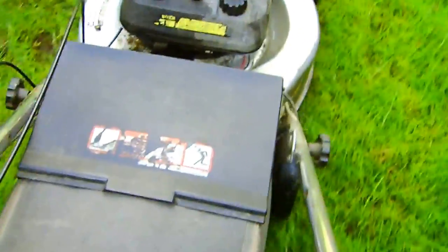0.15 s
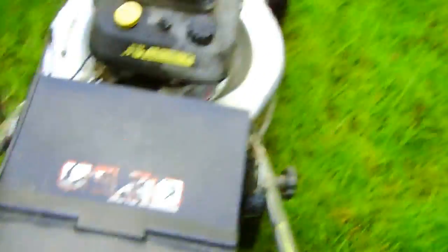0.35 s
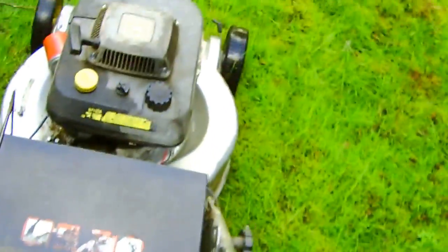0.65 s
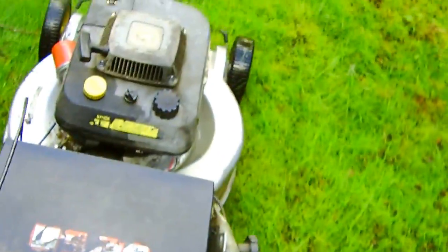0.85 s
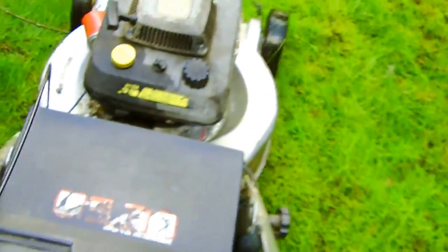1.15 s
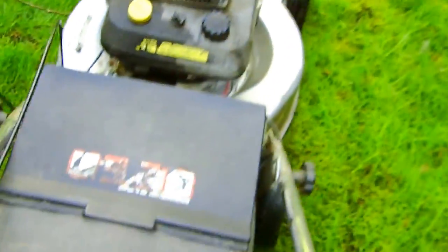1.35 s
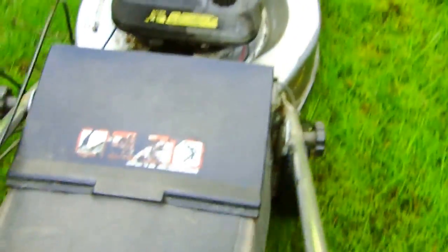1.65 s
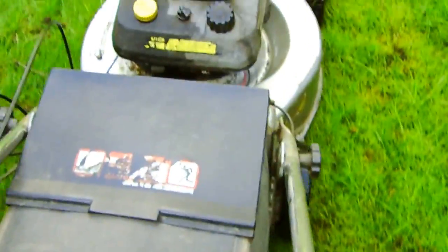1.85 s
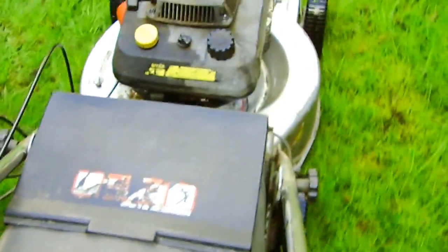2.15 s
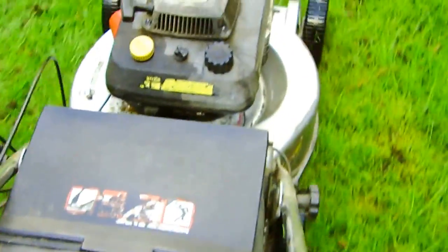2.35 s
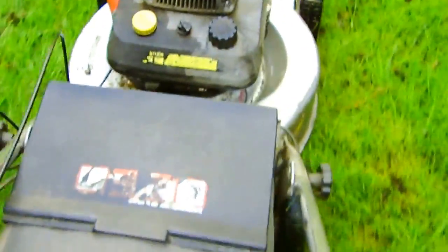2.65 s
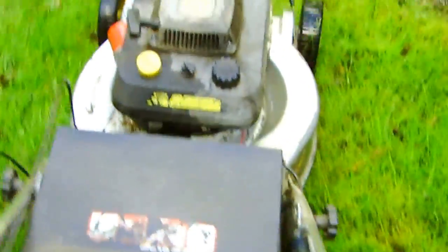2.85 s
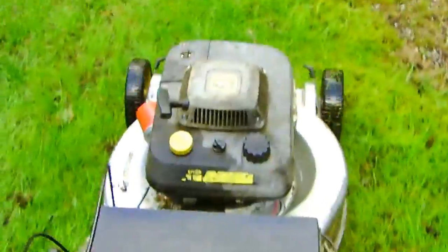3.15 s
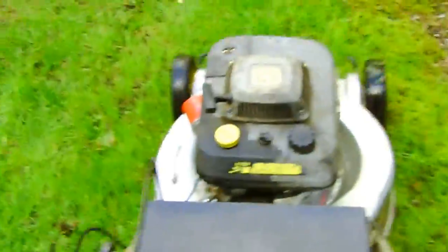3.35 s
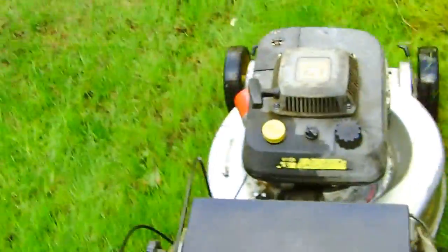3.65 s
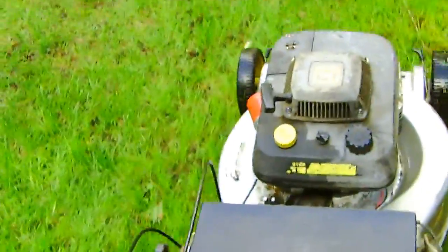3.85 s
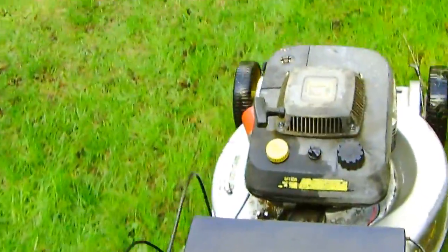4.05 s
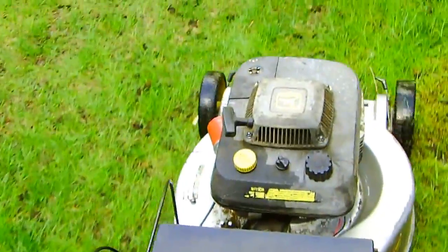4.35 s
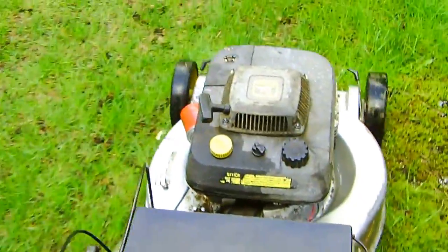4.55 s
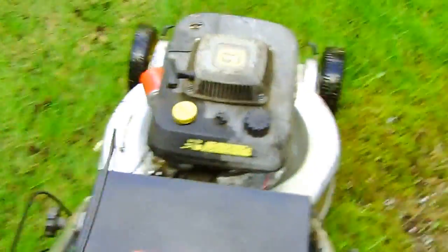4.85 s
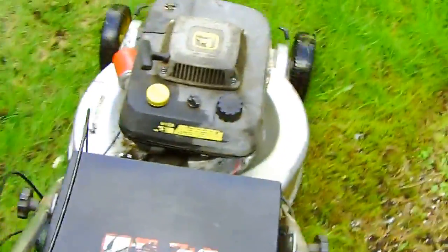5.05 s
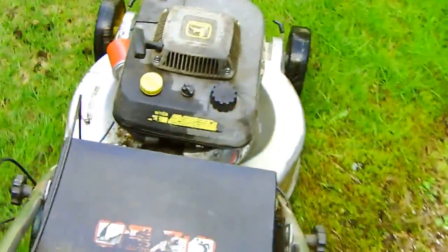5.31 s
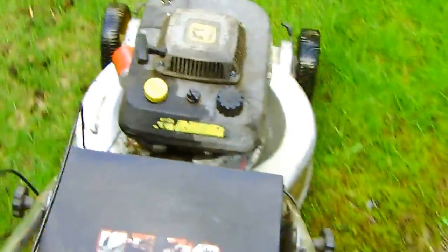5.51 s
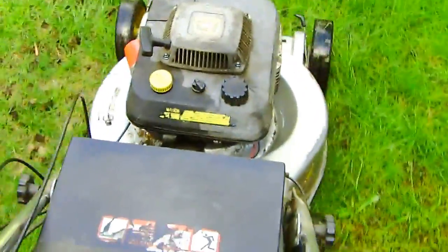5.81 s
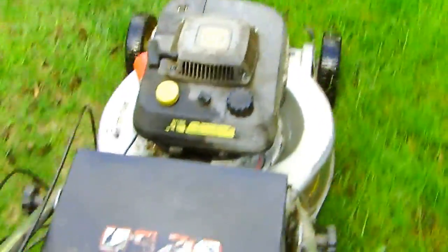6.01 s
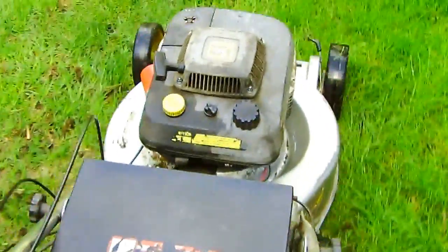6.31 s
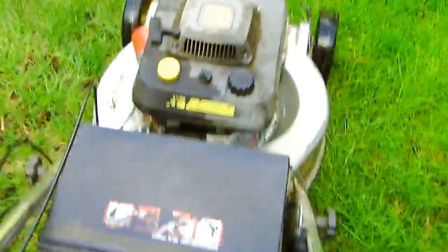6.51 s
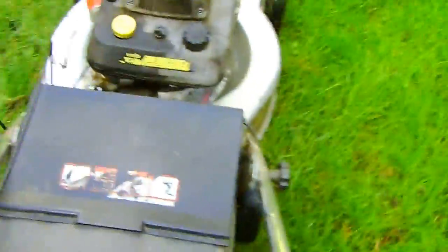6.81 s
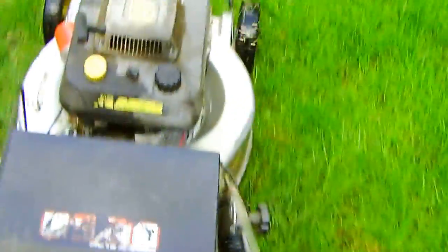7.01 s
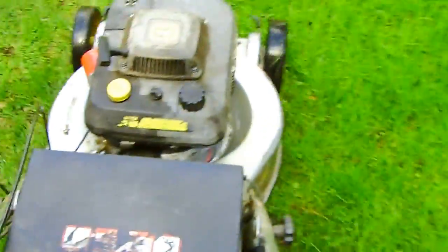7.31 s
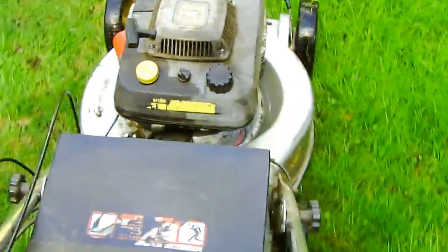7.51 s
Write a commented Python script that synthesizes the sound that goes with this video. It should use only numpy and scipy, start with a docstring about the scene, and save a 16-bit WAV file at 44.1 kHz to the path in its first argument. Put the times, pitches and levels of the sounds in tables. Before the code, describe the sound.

A petrol lawn mower already running is pushed over grass outdoors, heard close from the handle. A low blade hum near 97 hertz and its stronger octave dominate, with chute buzz, rushing deck air, rapid exhaust puffs, valve ticking, whines and clatter. Speed dips barely in thick grass, and cuttings brush the deck faintly once midway. The small microphone sounds dull and overloaded.

```python
"""A petrol lawn mower is pushed over grass, heard from the handle, its speed sagging slightly in thick grass.
The blade hums, slaps the air at the chute and churns air under the deck, made from sines and coloured noise.
The engine adds exhaust puffs, valve knocks, whines and clatter, locked to a firing cycle that runs a shade
faster than the slipping blade, so their tones beat slowly. In thick grass, cuttings once brush the deck.
A small, dull microphone flattens the loudest peaks."""
import sys
import numpy as np
from scipy import signal
from scipy.fft import rfft, irfft, next_fast_len
from scipy.io import wavfile
from scipy.ndimage import map_coordinates

SR = 44100
rng = np.random.default_rng(int(sys.argv[2]) if len(sys.argv) > 2 else 0)


def inscribe(sig):
    """Save sig as 16-bit PCM at rate SR to the path in sys.argv[1].

    A 1-D sig is mono; a 2-D sig holds one channel per row.
    Samples are clipped to [-1, 1] before scaling.
    """
    pcm = np.round(np.clip(np.atleast_2d(sig).T, -1, 1) * 32767)
    wavfile.write(sys.argv[1], SR, pcm.astype(np.int16))


N = 338247
TIME = np.arange(N) / SR  # seconds

# Table levels are starting values: the functions add their own trims and wavering.
# Thick patches of grass that slow the blade: (middle [s], length [s], loss of speed [turns/s])
THICK_GRASS = [(0.3, 1.1, .19), (2.7, .6, .22), (3.8, .55, .28)]
# Deck hum as the microphone sways over it: (time [s], blade-pass tone [dB], its octave [dB])
DECK_HUM = [(0, -9.5, -2), (0.6, -14, -3.5), (1.45, -11, -6.5), (1.9, -12.5, -1.2), (2.2, -13.5, -2.5),
            (2.5, -10.7, -7), (2.8, -12.5, -3), (3.7, -13.5, -6), (4, -12.5, -3.5), (4.85, -10.5, -8),
            (5.6, -14.5, -4.5), (7.3, -12.5, -6), (7.67, -16, -6)]
# Two tones the grass chute favours: (time [s], third multiple [dB], fourth multiple [dB])
CHUTE_TONES = [(0.0, -24, -20), (0.45, -31, -17), (0.7, -29, -24), (1.7, -11.5, -23.5), (2.7, -17.5, -25.5),
               (3.4, -20, -22.5), (4.6, -15, -27), (6.1, -17, -22.5), (7.67, -16, -17.5)]
# Slap of the blade tips at the chute: (multiple of the blade-pass rate, level [dB])
TIP_SLAP = [(5, -33.5), (6, -28), (7, -28), (8, -26), (9, -25.5), (10, -35.5)]
# Strength of the air churning in the deck: (time [s], level [dB])
AIR_LEVEL = [(0.0, -16), (1.2, -16.5), (1.9, -17.5), (2.5, -16), (3.4, -18), (5.1, -15.5), (6.5, -13.5),
             (7.0, -15), (7.67, -14.5)]
# Colour of the air under the deck: (frequency [Hz], relative level [dB per Hz])
AIR_COLOUR = [(20, -21.5), (90, -19.5), (160, -6.5), (230, 2.5), (320, 1.5), (420, -1.5), (560, -1),
              (800, -5), (1100, -8.5), (1500, -18), (3000, -31)]
# Exhaust note: (multiple of the firing rate, level [dB])
EXHAUST_NOTE = [(1, -31.5), (2, -19.5), (3, -31.5), (4, -33), (5, -20.5), (6, -21), (7, -41.5), (8, -34),
                (9, -34), (10, -31.5), (11, -44), (12, -25), (13, -27.5), (14, -35.5), (15, -37.5),
                (16, -24.5), (17, -42), (18, -26.5), (19, -38), (21, -39.5), (22, -34), (24, -37.5),
                (26, -49), (28, -43.5), (32, -52), (36, -47.5), (38, -41), (40, -48.5), (47, -47.5),
                (52, -64.5)]
# Valve knocks: (place in the firing cycle [0-1], relative level [dB])
VALVE_KNOCKS = [(0.079, -4.5), (.18, -7), (.7, 3), (0.919, 1)]
# Ring of the engine casing: (frequency [Hz], time to fall by 60 dB [s], relative level [dB])
CASING_RING = [(1595, 0.047, -3), (2560, .012, -0.5), (2877, .015, -0.5), (3596, 0.028, -8.5),
               (4340, .025, -6), (5217, 0.026, -7.5), (5740, 0.021, -7.5)]
# Casing ring and whines, loudest with the microphone over the engine: (time [s], level [dB])
ENGINE_LEVEL = [(0.0, -28.5), (1.4, -29.5), (1.85, -29.5), (2.3, -27.8), (3.3, -27.5), (4.5, -28.5),
                (5.2, -29.5), (7.67, -29.5)]
# Running-gear whines: (frequency at mean speed [Hz], relative level [dB], depth of shake by each firing)
GEAR_WHINES = [(1139, -6, .4), (1574, -5, 1.1), (1859, -11, .4), (2050, -10, .6), (2482, -6, 1.8),
               (2790, -10, 1)]
# Colour of the engine clatter and cooling fan: (frequency [Hz], relative level [dB per Hz])
CLATTER_COLOUR = [(500, -24), (1300, -10), (1600, 0.5), (1900, 0.5), (2300, 1.5), (2650, 2.5), (2980, 2),
                  (3250, -4), (3700, -2), (4600, -6), (5200, -6.5), (5550, -15.5), (6100, -9.5),
                  (7500, -15.5)]


def gain_of(db):
    """Turns decibels into a multiplying factor."""
    return 10 ** (np.asarray(db) / 20)


def evened(x):
    """Scales a sound to an rms (average strength) of 1."""
    return x / np.sqrt(np.mean(x ** 2) + 1e-20)


def follow(rows):
    """Draws straight lines between a table's times, giving one curve for each further column."""
    s, *columns = np.transpose(rows)
    return [np.interp(TIME, s, column) for column in columns]


def noise(colour):
    """Filters random noise to the given colour, at rms 1."""
    hz, db = np.transpose(colour)
    size = next_fast_len(N)
    bins_hz = np.fft.rfftfreq(size, 1 / SR)
    shape_db = np.interp(np.log(bins_hz + 1), np.log(hz), db)
    spectrum = rfft(rng.standard_normal(size)) * gain_of(shape_db)
    return evened(irfft(spectrum, size)[:N])


def wander(rate_hz):
    """Random drift of rms 1, with changes up to about the given rate."""
    step = 32  # samples between drift points
    size = N // step + 2
    hz = np.fft.rfftfreq(size, step / SR)
    spectrum = rfft(rng.standard_normal(size)) / (1 + (hz / rate_hz) ** 4)
    drift = irfft(spectrum, size)
    return evened(np.interp(TIME, np.arange(size) * step / SR, drift))


def tone(turns, db):
    """A sine wave of the given rms level; one turn is one wave."""
    return np.sqrt(2) * gain_of(db) * np.cos(2 * np.pi * turns)


def bump(middle_s, length_s):
    """A smooth rise from 0 to 1 and back."""
    place = np.clip((TIME - middle_s) / length_s, -.5, .5)
    return np.cos(np.pi * place) ** 2


def blade_speed(steady_hz=48.735):
    """Blade turns a second: steady, but dragged down for a moment in each patch of thick grass."""
    return steady_hz - sum(loss * bump(s, length) for s, length, loss in THICK_GRASS)


def blade(passes, pass_db=-0.15, octave_db=-0.37, third_db=0.47, fourth_db=3.5, slap_db=-1.0, flutter_db=1.46):
    """Blade passes boom as two low tones; the tips slap the chute half a pass later, as higher multiples."""
    low, octave = follow(DECK_HUM)
    hum = tone(passes, low + pass_db) + tone(2 * passes, octave + octave_db)
    third, fourth = follow(CHUTE_TONES)
    partials = [(3, third + third_db), (4, fourth + fourth_db)] + TIP_SLAP
    slap = sum(tone(k * (passes + .5), db) for k, db in partials)
    flutter = flutter_db * wander(5.1)
    return hum + slap * gain_of(slap_db + flutter)


def churn(passes, level_db, trim_db=3.5, chop_db=1.0, gust_db=.5):
    """Turbulent air and cuttings under the deck make noise that swells with each blade pass and gusts."""
    chop = chop_db * np.sin(2 * np.pi * passes)
    gusts = gust_db * wander(35)
    return noise(AIR_COLOUR) * gain_of(level_db + trim_db + chop + gusts)


def exhaust(cycles, level_db=-1.6, uneven_db=1.0):
    """One puff a firing cycle, of wavering strength; the silencer smears it by delaying higher partials."""
    lead, smear = .17, .00577  # cycles; smear counts once more for each multiple
    multiples, levels = np.transpose(EXHAUST_NOTE)
    place = np.linspace(0, 1, 2048)  # one firing cycle
    puff = np.zeros(len(place))
    for k in range(1, 53):
        db = np.interp(k, multiples, levels)  # fills in multiples the table skips
        puff += tone(k * (place + lead - smear * k), db)
    return np.interp(cycles % 1, place, puff) * gain_of(level_db + uneven_db * wander(30))


def valves(cycles, level_db, trim_db=2.0, uneven_db=2.5, jitter_s=.0001):
    """Valve gear knocks at nearly the same places in each cycle; every knock rings the engine casing."""
    knocks = np.zeros(N)
    for place, db in VALVE_KNOCKS:
        at = np.flatnonzero(np.diff(np.floor(cycles - place)))  # samples where the cycle reaches this place
        late, size = rng.standard_normal((len(at), 2)).T
        shift = np.round(late * jitter_s * SR).astype(int)
        at = np.clip(at + shift, 0, N - 1)
        knocks[at] += gain_of(db + uneven_db * size)
    t = TIME[:SR // 10]
    ring = np.zeros(len(t))
    for hz, t60, db in CASING_RING:
        ring += gain_of(db - 60 * t / t60) * np.sin(2 * np.pi * hz * t)
    ringing = signal.oaconvolve(knocks, ring)[:N]
    return gain_of(level_db + trim_db) * evened(ringing)


def whines(cycles, level_db, trim_db=-3.0, waver_db=2.5):
    """Thin tones follow engine speed; each firing shakes their strength, adding a line on either side."""
    steady_s = cycles * TIME[-1] / cycles[-1]  # time stretched to follow the engine speed
    out = np.zeros(N)
    for hz, db, depth in GEAR_WHINES:
        shake = 1 + depth * np.cos(2 * np.pi * (cycles - .2))
        turns = hz * steady_s + .15 * wander(5)  # pitch is slightly unsteady
        waver = waver_db * wander(3.1)
        out += shake * tone(turns, level_db + trim_db + db + waver)
    return out


def clatter(cycles, level_db=-25.5, trim_db=5.5, throb_db=0.82, rattle_db=1.4, regular=.3):
    """Rattle and fan hiss swell once a firing cycle; part of the noise repeats from cycle to cycle."""
    place = (cycles % 1) * N / cycles[-1]  # samples into a cycle of mean length
    first = map_coordinates(noise(CLATTER_COLOUR), [place], order=3)
    second = map_coordinates(noise(CLATTER_COLOUR), [place], order=3)
    drift = 1.14 * wander(1.5)  # the repeating pattern changes slowly as the mower rocks
    pattern = first * np.cos(drift) + second * np.sin(drift)
    # regular is the repeating share of the power
    rattle = np.sqrt(regular) * evened(pattern) + np.sqrt(1 - regular) * noise(CLATTER_COLOUR)
    throb = throb_db * np.cos(2 * np.pi * (cycles - .35))
    flicker = rattle_db * wander(130)
    return rattle * gain_of(level_db + trim_db + throb + flicker)


def scrape(middle_s=3.78, length_s=0.53, peak_db=-27, ring_hz=1280):
    """Cuttings brush the steel deck once, in the last thick patch, and excite one narrow resonance."""
    colour = [(ring_hz * .85, -40), (ring_hz * .98, 0), (ring_hz * 1.02, 0), (ring_hz * 1.15, -40)]
    return noise(colour) * gain_of(peak_db) * bump(middle_s, length_s)


def scene(blade_slip=.00413):
    """The blade passes twice a turn; the engine fires every second turn and runs slightly ahead of it."""
    turns = np.cumsum(blade_speed()) / SR
    passes = 2 * turns
    cycles = turns * (1 + blade_slip) / 2
    air_db, engine_db = follow(AIR_LEVEL)[0], follow(ENGINE_LEVEL)[0]
    deck = blade(passes) + churn(passes, air_db)
    engine = exhaust(cycles) + valves(cycles, engine_db) + whines(cycles, engine_db) + clatter(cycles)
    return (deck + engine + scrape())[None]


def record(dry, ceiling=0.99, dull_hz=5850, full_scale=0.98, hiss_db=-65, edge_hz=15830):
    """Overload flattens peaks, a low-pass filter dulls them, and its overshoots clip; faint hiss is added."""
    flat = np.clip(dry, -ceiling, ceiling)
    voice_band = signal.firwin(81, dull_hz, window=("kaiser", 7), fs=SR)
    dull = signal.oaconvolve(flat, voice_band[None], "same")
    clipped = np.clip(dull, -full_scale, full_scale)
    hiss = gain_of(hiss_db) * noise([(6000, 3.5), (11000, -2.5), (15000, -9.5)])
    edge = signal.firwin(511, edge_hz, window=("kaiser", 9), fs=SR)  # removes the very highest treble
    return signal.oaconvolve(clipped + hiss, edge[None], "same")


dry = scene()
out = record(dry)
inscribe(out)
```